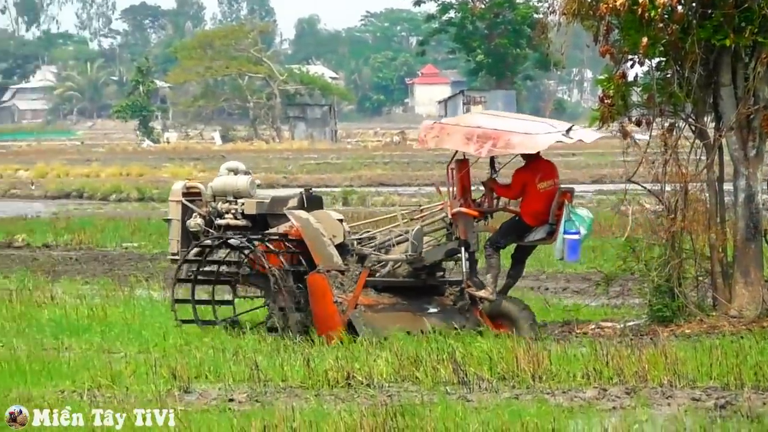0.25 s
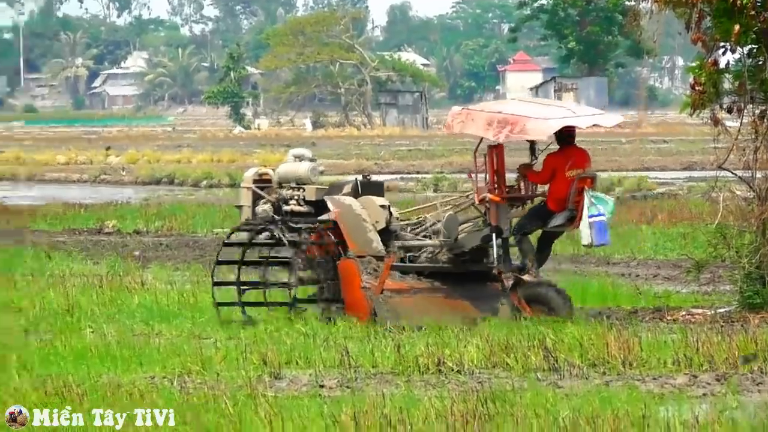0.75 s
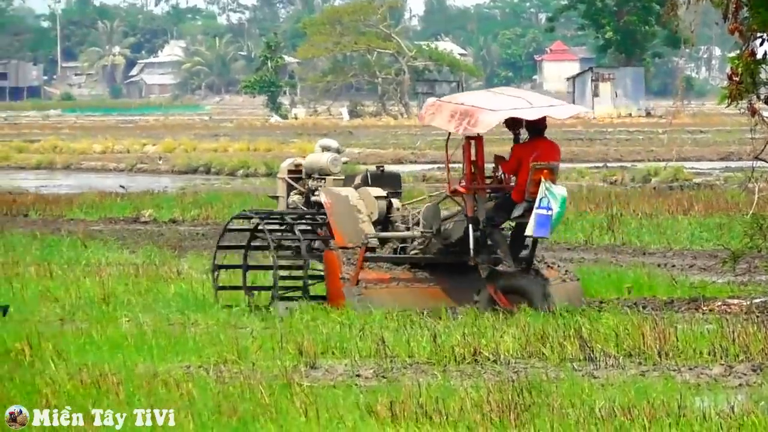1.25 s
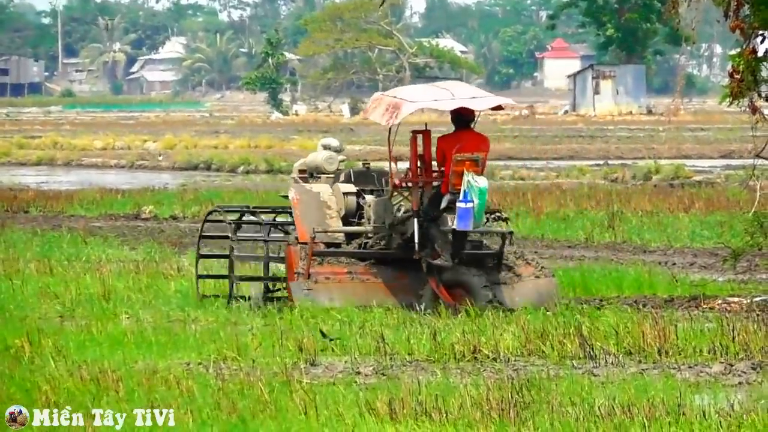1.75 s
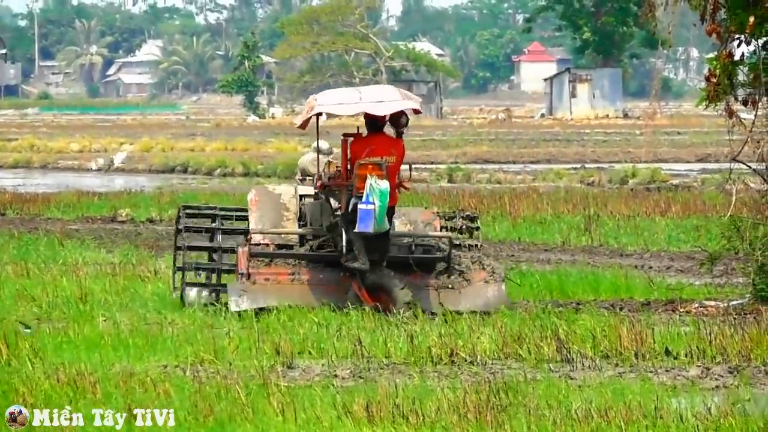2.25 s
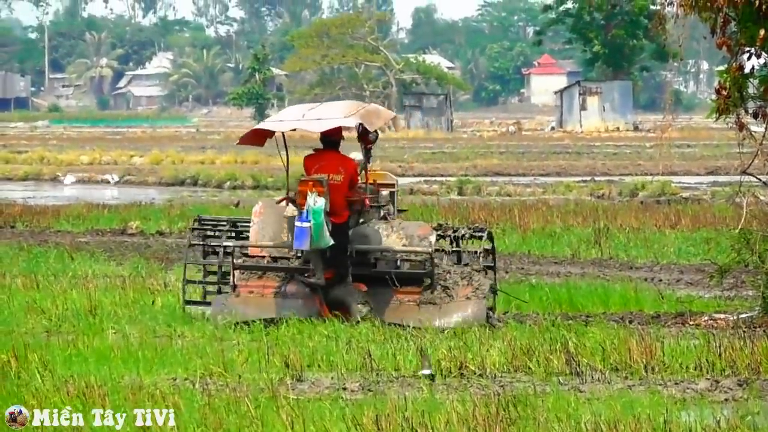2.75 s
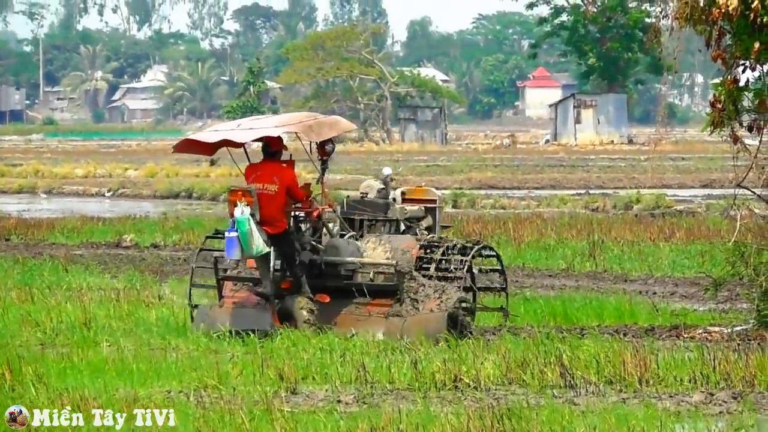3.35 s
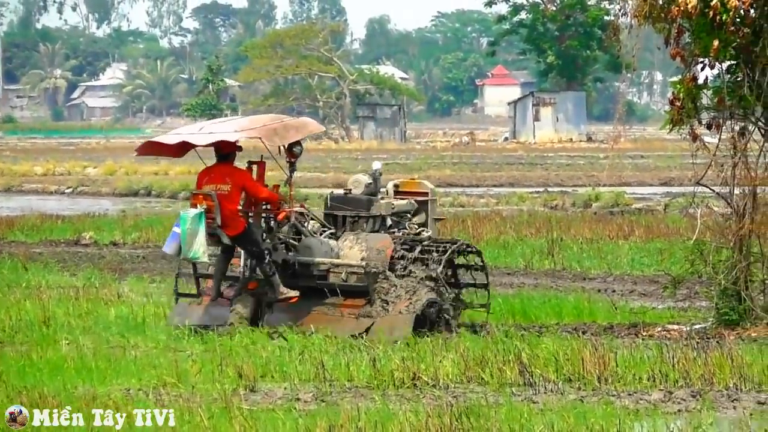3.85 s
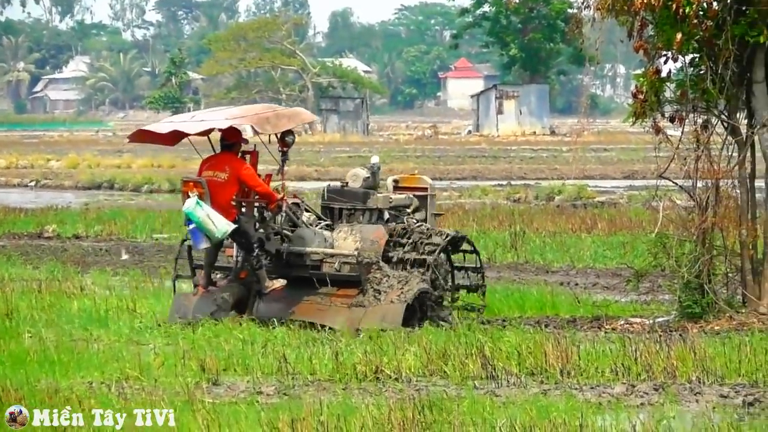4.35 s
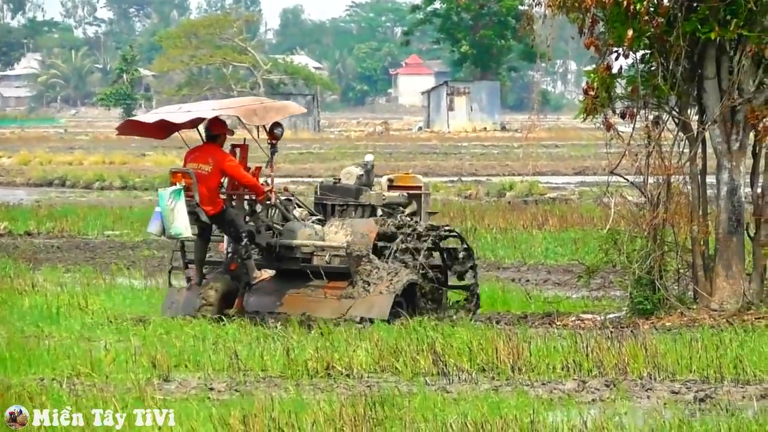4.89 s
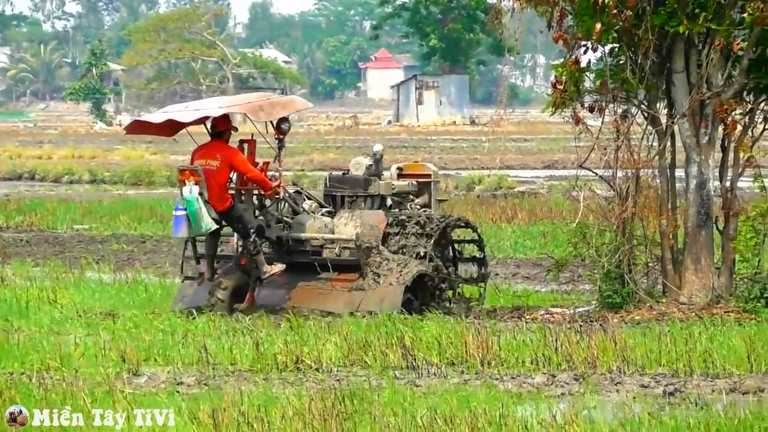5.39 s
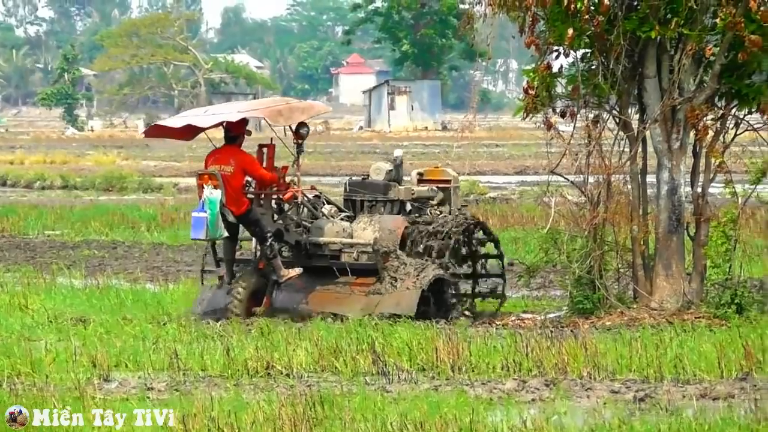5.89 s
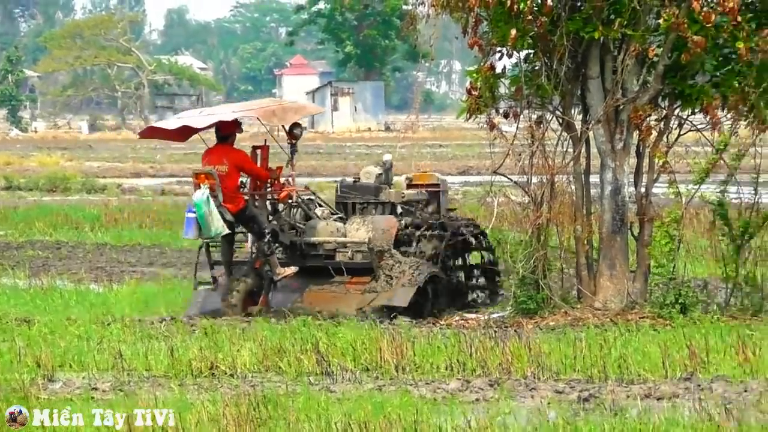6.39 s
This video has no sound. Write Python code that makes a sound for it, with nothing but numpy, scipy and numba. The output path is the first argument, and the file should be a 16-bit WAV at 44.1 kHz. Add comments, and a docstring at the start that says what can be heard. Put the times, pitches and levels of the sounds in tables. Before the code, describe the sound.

An open wet field, a diesel tiller at a distance and wind directly on a stereo microphone. From 0 s the engine chugs rapidly at about 47 firings a second, a rough noisy throb with block clatter and crisp injector knock, slightly hollow from ground reflection. Breeze and soft low puffs blow over it, and bright metal ticks cluster up to about 1.8 s. Around 2 s the engine's clatter drops back and the wind surges: heavy buffets and sharp pops, strongest near 2.3 s, with the left side generally louder. From 2.5 s the deep bass thins, leaving drier flutters, with another big pop near 3.55 s. The engine bogs slightly around 3.9 s, then climbs from about 4.5 s to a faster, brighter run by 5.8 s. Duller clacks appear after 4.3 s. Between 5.6 and 6.4 s two gear tones whine, flicker and fade; wind and engine continue to the end.

```python
"""In a wet field a four-cylinder diesel tiller turns, far from a camera whose two microphone ports catch the wind.
From the start its firings gate noise of exhaust, block and injectors, and ground echo combs it; light air and
puffs pass, carried from the right port to the left. Metal ticks soon join, then pops of strong eddies.
After two seconds the bass thins out, returning only in part; late on, two gear tones whine and fade."""
import sys
import numpy as np
from scipy import signal
from scipy.fft import rfft, irfft
from scipy.io import wavfile
from scipy.ndimage import uniform_filter1d
from numba import njit

SR = 44100
rng = np.random.default_rng(int(sys.argv[2]) if len(sys.argv) > 2 else 0)


def put_to_file(sound):
    """Save the sound as 16-bit audio at rate SR, in the file named by the first command-line argument."""
    columns = np.atleast_2d(sound).T  # one column per channel
    safe = np.clip(columns, -1, 1)
    whole_steps = np.round(safe * 32767)
    wavfile.write(sys.argv[1], SR, whole_steps.astype(np.int16))


N = 292369  # length [samples]


def undb(db):
    """Decibels to amplitude ratio."""
    return 10 ** (np.asarray(db) / 20)


def unit(x):
    """Scale x to rms 1."""
    return x / np.sqrt(np.mean(x ** 2))


def noise():
    """White noise of the full length."""
    return rng.standard_normal(N)


def curve(table):
    """Columns of a table joined by straight lines, one value a sample."""
    s, *columns = np.transpose(table)
    return [np.interp(np.arange(N) / SR, s, c) for c in columns]


def colour(x, points):
    """Shape x by (frequency [Hz], level [dB]) points joined on a log frequency axis; rms 1."""
    hz, db = np.transpose(points)
    f = np.maximum(np.fft.rfftfreq(len(x), 1 / SR), 1)
    gain_db = np.interp(np.log(f), np.log(hz), db, -90, -90)
    return unit(irfft(rfft(x) * undb(gain_db), len(x)))


def band(x, lo_hz, hi_hz):
    """Fixed band-pass."""
    return signal.sosfilt(signal.butter(N=2, Wn=[lo_hz, hi_hz], btype="band", fs=SR, output="sos"), x)


def low(x, hz, order):
    """Fixed low-pass."""
    return signal.sosfilt(signal.butter(N=order, Wn=hz, fs=SR, output="sos"), x)


@njit
def svf(x, hz, k):
    """State-variable filter with a moving corner and damping k: low-pass and high-pass."""
    low, high, b, l = np.empty(len(x)), np.empty(len(x)), 0., 0.
    for i in range(len(x)):
        g = np.tan(np.pi * hz[i] / SR)
        v = (b + g * (x[i] - l)) / (1 + g * (g + k))
        low[i] = l + g * v
        high[i] = x[i] - k * v - low[i]
        b, l = 2 * v - b, 2 * low[i] - l
    return low, high


def resonate(x, hz, width):
    """The moving band left when lows and highs are taken away."""
    return x - sum(svf(x, hz, width))


def walk(rate):
    """Random levels held 1 / rate s and slewed twice; rms 1."""
    k = int(SR / rate)
    held = np.repeat(rng.standard_normal(N // k + 1), k)
    return unit(uniform_filter1d(uniform_filter1d(held, k), k)[:N])


def late(x, samples):
    """x heard a (moving) number of samples later."""
    return np.interp(np.arange(N) - samples, np.arange(N), x)


# engine speed: (time [s], mean firing rate [Hz], load [0-1])
REVS = [(0, 45.5, 0.5), (.5, 47.35, 0.7), (.85, 46.15, 0), (1.2, 47.3, 0.83), (2, 46.9, 0.26),
        (3.2, 47.4, 0.36), (3.6, 48.43, 1), (3.9, 41.92, 1), (4.4, 44.04, 0.6), (4.7, 46.84, 0.6),
        (4.95, 50.8, 0.6), (5.2, 51.7, 0.3), (5.5, 56.3, 0.65), (5.8, 58.8, 0.6), (6.63, 58.9, 0.65)]
# strength of the four firings of a cycle, before random spread: (level [dB])
CYLINDERS_DB = [3.6, 1.3, 7.6, 1.8]
# mean exhaust level: (time [s], level [dB])
EXHAUST_LEVEL = [(0, -30), (1.9, -31), (2.4, -35), (3.7, -29), (5, -31), (6.63, -28)]
# mean engine levels: (time [s], block clatter [dB], injector knock [dB])
ENGINE = [(0, -51, -54.5), (.45, -52.5, -52.5), (.6, -51.5, -55), (1.45, -50.5, -52.5), (1.7, -52.5, -54),
          (2.07, -61.5, -58.5), (2.5, -58.5, -57.5), (3.12, -54.5, -60), (3.55, -51, -56.5),
          (3.69, -46.5, -52.5), (3.92, -50.5, -53.5), (4.02, -49.5, -57), (4.41, -51, -56),
          (4.78, -48, -51), (5.04, -50, -58), (5.35, -52, -57.5), (5.62, -47.5, -49.5), (5.85, -49, -53),
          (6.08, -46.5, -54.5), (6.63, -47.5, -54)]
# exhaust spectrum: (frequency [Hz], relative density [dB per Hz])
EXHAUST = [(25, -8), (60, 1), (120, -1), (240, 3), (290, -3), (390, -3), (465, -3), (500, -5.5),
           (575, -14.5), (625, -7), (655, -6.5), (730, -7.5), (790, -7), (890, -11), (970, -17),
           (1090, -24.5), (1200, -22.5), (2000, -28.5), (3000, -38.5)]
# block clatter spectrum: (frequency [Hz], relative density [dB per Hz])
CLATTER = [(900, 7.5), (1500, 6), (1900, -6), (2300, -2), (2600, -3.5), (3200, 3.5), (3650, -0.5),
           (4000, 2.5), (4300, -2), (4650, -7.5), (4900, -2.5), (5200, -19), (6500, -1)]
# injector knock spectrum: (frequency [Hz], relative density [dB per Hz])
KNOCK = [(3500, -3.5), (5000, -0.5), (6500, 0), (8300, 0.5), (9500, -6), (11000, -21.5), (13000, -28),
         (15600, -35)]
# ungated gas hiss spectrum, level following the knock: (frequency [Hz], relative density [dB per Hz])
HISS = [(7000, -14), (9500, -1), (11000, 0), (13000, -7), (15600, -10)]
HISS_DB = -15  # mean, relative to the knock


def diesel():
    """Each firing opens a burst of noise in exhaust, block and injectors; load deepens the throb."""
    hz, load = curve(REVS)
    count = np.cumsum(hz * (1 + 0.028 * walk(12))) / SR
    firing, phase = count.astype(int), count % 1
    spread_db = 2.0 * rng.standard_normal(firing[-1] + 1)
    size = load * undb(np.array(CYLINDERS_DB)[firing % 4] + spread_db[firing])

    def burst(points, depth, rise):
        """Noise under the firing gate; rise is the share of a firing period up to its peak."""
        gate = 1 + depth * size * phase / rise * np.exp(1 - phase / rise)
        # dividing by the local mean leaves the throb but evens the level
        return colour(gate / uniform_filter1d(gate, SR // 8) * noise(), points)

    exhaust_db, = curve(EXHAUST_LEVEL)
    clatter_db, knock_db = curve(ENGINE)
    exhaust = undb(exhaust_db + 0.2 * walk(15)) * burst(EXHAUST, depth=0.6, rise=0.099)
    clatter = undb(clatter_db + 0.83 * walk(11)) * burst(CLATTER, depth=0.52, rise=0.23)
    knock = undb(knock_db + 0.74 * walk(18)) * burst(KNOCK, depth=0.73, rise=0.064)
    hiss = undb(knock_db + HISS_DB + 1.2 * walk(14)) * colour(noise(), HISS)
    return exhaust + clatter + knock + hiss


GROUND_MS, GROUND_SHARE = 0.904, 0.39  # delay, and strength of the echo against the direct sound
GROUND_HZ = 4000  # stubble scatters the echo above this


def ground_echo(machine):
    """A delayed, dulled copy off the wet soil combs the machine's sound."""
    echo = low(late(machine, SR * GROUND_MS / 1000), GROUND_HZ, order=2)
    return (machine + GROUND_SHARE * echo) / np.hypot(1, GROUND_SHARE)


# light air spectrum at the ports: (frequency [Hz], relative density [dB per Hz])
BREEZE = [(20, 13.5), (60, -1), (150, -8.5), (350, -12.5), (800, -13.5), (1500, -32), (3000, -29)]
BREEZE_DB = -43  # mean level
BREEZE_SHARED_HZ = 70  # slower swirls press on both ports alike


def breeze():
    """Light air that never rests: unrelated on the two ports but for its deepest part."""
    both = np.array([undb(BREEZE_DB + 4.1 * walk(8.8)) * colour(noise(), BREEZE) for _ in range(2)])
    deep = low(both, BREEZE_SHARED_HZ, order=1)
    return both - deep + deep.sum(axis=0) / np.sqrt(2)


PORT_GAP_MM, EDDY_MM, EDDIES_KEPT = 3.08, 10.77, 0.62  # gap, eddy size, amplitude share that survives it
PORT_HZ, LEE_HZ = 2350, 1130  # the port mesh stops the finest eddies; they also fade on the way across
CHURN_DB, CHURN_PER_S = 3.5, 45  # spread and rate of the churn's level
SPEED_SPREAD, GUST_M_S_PER_DB = 0.068, 0.067  # share the speed wanders; extra speed per dB above mean churn
CRACKLE_DB, CRACKLE_PER_S = -15.5, 350
# air across the port edge sings a loose pitch; ratios are to the eddy rate
WHISTLE_DB, WHISTLE_RATIO, WHISTLE_WIDTH, WHISTLE_WANDER = -11.5, 1.377, 0.25, 0.2
MOAN_DB, MOAN_RATIO, MOAN_WIDTH = -8.5, 0.418, 0.29  # the housing sheds slower swirls that hum a lower pitch
POP_LEFT_DB = -7  # extra share of each pop that bursts on the left port
POP_WAKE_DB, POP_WAKE_MS = -18, 7.3  # rush of air behind a pop: relative level, decay time of its power
# wind: (time [s], base air speed [m/s], left minus right [dB], mean level of the churn between puffs [dB])
WIND = [(0, 1.67, 2, -40.5), (.5, 4.04, 1, -46.5), (1.0, 3.4, 8, -36), (1.5, 2.58, -1, -44),
        (1.98, 2.7, 6, -51), (2.14, 4.5, 4.5, -34), (2.2, 4.3, 3.5, -29.5), (2.31, 4.25, 3, -31),
        (2.42, 4.93, 1.5, -23.5), (2.48, 7.2, 9, -31.5), (2.55, 4.37, 6, -34.5), (2.8, 4.9, 4.5, -30.5),
        (3.35, 6.1, 8, -27.5), (3.47, 6.2, 5, -36.5), (3.63, 6.3, 8.5, -38), (3.8, 6.9, 10, -32),
        (3.97, 5.5, 8, -30.5), (4.12, 6.7, 9.5, -51), (4.25, 6.15, 15, -38.5), (4.55, 5.7, 9, -35),
        (5.05, 6.3, 9, -37.5), (5.15, 6.1, 9.5, -42), (5.4, 5.66, 6.5, -33), (5.6, 4.5, 5, -31.5),
        (5.7, 3.94, 6, -35), (5.95, 4.06, 3.5, -32.5), (6.63, 4.15, 6.5, -34)]
# the strongest puffs: (time of the middle [s], level [dB], length at half power [ms])
PUFFS = [(0.084, -28, 9.9), (0.119, -26, 13), (0.508, -22, 35.5), (0.815, -24, 4.7), (0.876, -28.5, 7.2),
         (1.204, -24, 15), (2.018, -21, 16.6), (2.055, -21.5, 27), (2.109, -21.5, 36), (2.157, -25, 10),
         (2.185, -16.5, 23), (2.205, -27, 17), (2.24, -15, 36), (2.384, -18.5, 47), (2.43, -27, 30),
         (2.475, -12.5, 8), (2.563, -23, 62), (2.637, -23.5, 38), (2.713, -18.5, 3.8), (2.744, -19, 38),
         (2.79, -21.5, 11), (2.829, -18.5, 43), (2.89, -22, 30), (2.934, -17.5, 23), (2.976, -19, 19),
         (3.007, -16.5, 9.3), (3.091, -23.5, 64), (3.217, -19, 40), (3.312, -24, 73), (3.397, -16.5, 6.2),
         (3.435, -16, 16.5), (3.559, -17, 39), (3.516, -23.5, 15), (3.77, -20.5, 5.4), (3.803, -22.5, 8.8),
         (3.845, -26, 8.2), (3.941, -24, 47), (4.003, -21, 20), (4.05, -25, 30), (4.11, -23.5, 39),
         (4.144, -25, 11), (4.287, -30.5, 13), (4.512, -25.5, 13), (4.539, -22, 9.3), (4.57, -22, 6.2),
         (4.602, -23.5, 19), (4.671, -19.5, 24), (4.734, -23, 17), (4.772, -24, 34), (4.865, -21, 52),
         (4.923, -24, 19), (4.985, -21.5, 18), (5.025, -22, 29), (5.075, -24, 9.1), (5.195, -24, 15),
         (5.237, -25, 30), (5.276, -18.5, 13.2), (5.359, -17.5, 51), (5.4, -21, 20), (5.448, -20, 34),
         (5.501, -24, 50), (5.537, -22, 14), (5.646, -22, 16), (5.67, -25.5, 22), (5.738, -22.5, 25),
         (5.767, -22, 6.6), (5.831, -20.5, 27), (5.89, -18, 15), (5.929, -21, 30), (5.964, -26, 14),
         (6.035, -17, 17.4), (6.062, -19.5, 18), (6.241, -21.5, 43.8), (6.295, -22, 7.8),
         (6.357, -19.5, 22), (6.4, -21, 24), (6.473, -22, 43), (6.559, -17, 31), (6.588, -16.5, 6.1)]


def wind():
    """Eddies carried past both ports: faster air is brighter and crosses the gap sooner."""
    t = np.arange(N) / SR
    base_speed, pan_db, churn_db = curve(WIND)
    power = undb(2 * (churn_db + CHURN_DB * walk(CHURN_PER_S)))
    for s, db, ms in PUFFS:
        power += undb(2 * db) * np.exp(-4 * np.log(2) * ((t - s) / (ms / 1000)) ** 2)
    for s, db, *_ in POPS:
        wake = (t > s) * np.exp(-np.abs(t - s) / (POP_WAKE_MS / 1000))
        power += undb(2 * (db + POP_WAKE_DB)) * wake
    # a puff is faster air than the churn round it; the speed also wanders
    gust = GUST_M_S_PER_DB * (10 * np.log10(power) - churn_db)
    speed = np.maximum(base_speed * (1 + SPEED_SPREAD * walk(25)) + gust, 1)
    hz = np.clip(speed / (EDDY_MM / 1000), 100, 4000)  # eddies passing a second

    def eddies(bottom):
        """Body, snaps, whistle and moan of the air; the body starts at bottom times the eddy rate."""
        lumpy = undb(2.8 * walk(220) + 1.26 * walk(90)) * noise()
        body = svf(svf(lumpy, hz, 0.87)[0], 1.41 * hz, 2.56)[0] / np.sqrt(hz)
        body = svf(body, bottom * hz, 1.13)[1]

        pitch_hz = WHISTLE_RATIO * hz * np.exp(WHISTLE_WANDER * walk(22))
        whistle = resonate(lumpy, pitch_hz, WHISTLE_WIDTH)
        whistle = resonate(whistle, pitch_hz, 2 * WHISTLE_WIDTH) / np.sqrt(pitch_hz)

        moan_hz = MOAN_RATIO * hz * np.exp(0.15 * walk(16))
        moan = resonate(undb(3.9 * walk(24)) * noise(), moan_hz, MOAN_WIDTH) / np.sqrt(moan_hz)

        # tiny eddies snap now and then and reach higher
        snaps = (rng.random(N) < CRACKLE_PER_S / SR) * noise()
        snaps = svf(svf(snaps, 1.83 * hz, 2.0)[0], 3.7 * hz, 6.0)[0]
        snaps = svf(snaps, 1.16 * hz, 0.4)[1]

        mix = unit(body) + undb(CRACKLE_DB) * unit(snaps)
        mix += undb(WHISTLE_DB) * unit(whistle) + undb(MOAN_DB) * unit(moan)
        return np.sqrt(power) * mix

    # large eddies cover both ports, so the fresh ones are small
    bursts = pops()
    right, fresh = eddies(bottom=0.15) + bursts, eddies(bottom=0.31)
    lag = SR * PORT_GAP_MM / 1000 / speed
    carried = EDDIES_KEPT * low(late(right, lag), LEE_HZ, order=1)
    left = carried + np.sqrt(1 - EDDIES_KEPT ** 2) * fresh + undb(POP_LEFT_DB) * late(bursts, lag)
    pan = undb(np.array([pan_db, -pan_db]) / 2)
    return pan * low(np.array([left, right]), PORT_HZ, order=4)


TICK_CYCLES = 12  # a tick fades to about a third in this many cycles of its ring
# linkage ticks: (time [s], rms level before the fade [dB], ring [Hz])
TICKS = [(0.0957, -52, 6500), (0.163, -45, 6300), (0.2274, -43, 7500), (0.25, -47, 7000),
         (0.295, -51, 6800), (0.3156, -45, 4000), (0.334, -47, 7000), (0.4459, -36, 6500),
         (0.477, -41, 6500), (0.687, -44, 8000), (0.853, -51, 8300), (0.88, -47, 8200), (1.1902, -44, 7800),
         (1.253, -50, 7300), (1.2744, -44, 7996), (1.577, -55, 7500), (1.812, -45, 8520),
         (3.6634, -47.5, 3310), (3.7083, -44, 4120), (4.321, -36.5, 2350), (4.4211, -36, 2155),
         (4.5233, -41, 2457), (4.7959, -41, 4080), (4.8184, -36, 2120), (5.6394, -50, 2016),
         (5.793, -43, 2200), (6.01, -44, 2300), (6.111, -41, 2882), (6.34, -36, 1900), (6.449, -44, 1927)]


def ticks():
    """Short metal clacks: a fading burst of noise round the ring of the part."""
    out, t = np.zeros(N + 2000), np.arange(2000) / SR
    for s, db, hz in TICKS:
        i = int(s * SR)
        ring = rng.standard_normal(2000)
        for _ in range(2):
            ring = band(ring, 0.78 * hz, 1.32 * hz)
        out[i:i + 2000] += undb(db) * np.exp(-t * hz / TICK_CYCLES) * unit(ring)
    return out[:N]


POP_CYCLES, POP_ROUNDING = 1.3, 1.4  # ring length and how abruptly it ends
# strong single eddies on the ports: (time [s], swing before its envelope [dB], pitch [Hz], crack [dB])
POPS = [(0.484, -16.5, 111, -55), (0.5, -15, 230, -52), (0.69, -16.5, 137, -55), (0.806, -10.5, 267, -52),
        (2.015, -9, 258, -51), (2.176, -8, 247, -34), (2.224, -10, 245, -30), (2.257, -4.5, 235, -43),
        (2.267, 3, 330, -27.5), (2.341, -15, 190, -45), (2.35, -10, 400, -34), (2.376, -7, 357, -34),
        (2.388, -16, 251, -36), (2.424, -16, 400, -34), (2.472, -32, 450, -28), (2.647, -13, 500, -36),
        (2.711, -10, 324, -49), (2.734, -11, 405, -37), (2.931, -8.5, 344, -38), (3.326, -10, 300, -42),
        (3.399, -7, 403, -41), (3.422, -11, 346, -33), (3.504, -15, 412, -41), (3.552, 1.5, 443, -24),
        (3.566, -15, 450, -30), (3.687, -11, 282, -40), (3.757, -6.5, 641, -44), (3.903, -12.5, 327, -40),
        (3.994, -11, 302.4, -30), (4.012, -6, 1290, -40), (4.044, -6, 695, -44), (4.082, -3.5, 740, -42),
        (4.139, -15, 600, -42), (4.566, -9.5, 454, -43), (4.656, -16, 378, -36), (4.663, -12, 398, -38),
        (4.725, -10, 516, -50), (4.768, -12, 250, -50), (4.801, -9, 646, -38), (4.834, -12, 303, -42),
        (4.871, -13, 411, -35), (5.031, -10.5, 275, -25.5), (5.332, -12, 298, -43),
        (5.347, -18.5, 350, -45), (5.36, -8.5, 349, -35), (5.374, -8, 458, -35), (5.477, -10.5, 258.5, -46),
        (5.637, -9.5, 386, -52), (5.821, -7, 453, -37), (5.864, -11, 300, -42), (5.885, -11, 277, -32),
        (5.913, -11.5, 210, -48), (5.923, -6, 216, -45), (5.934, -16, 230, -42), (6.026, -15, 278, -42),
        (6.192, -13, 499.5, -30), (6.474, -6, 283.7, -28), (6.358, -9.5, 201, -45), (6.429, -9.5, 250, -45),
        (6.525, -13, 350, -38), (6.583, -9.5, 210, -45)]


def pops():
    """Each pop is a quick swing that dies in a cycle or two, with a crack on its front."""
    out, t = np.zeros(N + 1000), np.arange(1000) / SR
    for s, db, hz, crack_db in POPS:
        i = int(s * SR)
        c = rng.standard_normal(1000)
        envelope = (1 - np.exp(-t / 0.0011)) * np.exp(-(t * hz / POP_CYCLES) ** POP_ROUNDING)
        swing = np.sign(c[0]) * np.sin(2 * np.pi * hz * t) * envelope  # pushes in or out at random
        crack = unit(band(c, 440, 3100)) * t / 0.0019 * np.exp(1 - t / 0.0016)
        out[i:i + 1000] += undb(db) * swing + undb(crack_db) * crack
    return out[:N]


# full pitch of the low and the high meshing tone: (frequency [Hz])
GEARS_HZ = [752, 1890]
GEARS_RASP_DB = -9  # relative to the tone
# gear whine: (time [s], pitch below full [%], low tone mean rms [dB], high tone mean rms [dB])
GEARS = [(5.56, 1.23, -70, -77), (5.62, 0.8, -39.5, -56), (5.69, 0.33, -51, -59), (5.74, 0, -43, -54),
         (5.775, 0.25, -41, -62), (5.82, 0.28, -40, -55.5), (5.87, 0, -41, -56), (5.9, 0.17, -33, -53),
         (5.935, 0, -37, -50), (5.99, 0.37, -41.5, -61), (6.06, 0, -41, -55), (6.12, 0, -51, -54),
         (6.16, 0.47, -31, -60), (6.185, 0, -54, -55), (6.22, 0.02, -34, -61), (6.28, 0, -44, -57),
         (6.35, 0, -42, -56), (6.42, 0.095, -47, -71), (6.47, 0.11, -75, -80)]


def gears():
    """Two meshing tones that climb to pitch, flicker each on its own and fade out, with rasp of worn teeth."""
    under_pitch, *levels = curve(GEARS)
    out = np.zeros(N)
    for hz, db in zip(GEARS_HZ, levels):
        flicker_db = 2.2 * walk(90) + 0.5 * walk(14)
        bend = 0.002 * walk(30) + 0.005 * walk(150)
        turns = np.cumsum(hz * (1 - under_pitch / 100) * (1 + bend)) / SR
        tone = np.sqrt(2) * np.sin(2 * np.pi * turns)
        rasp = undb(GEARS_RASP_DB) * unit(band(noise(), 0.97 * hz, 1.03 * hz))
        out += undb(db + flicker_db) * (tone + rasp)
    return out


def scene():
    """The distant machine, equal on both ports, under the wind that strikes them."""
    machine = diesel() + gears() + ticks()
    return ground_echo(machine) + wind() + breeze()


BASS_LEAK_DB = -26  # a little deep bass always passes the edge
WIDEN_DB, WIDEN_HZ = 1.5, 2100  # boost of the stereo side, and its upper edge
WIDEN_TOP_DB = -12.5  # the widening grows towards its upper edge
SELF_NOISE_DB = -73.5
TOP_HZ = 15640
# microphone self-noise spectrum: (frequency [Hz], relative density [dB per Hz])
SELF_NOISE = [(5000, -40), (8000, 4), (11000, 9), (15600, 5)]
# where the bass thins out: (time [s], edge [Hz])
BASS_EDGE = [(2.3, 22), (2.45, 40), (2.6, 136), (3.2, 144.9), (3.7, 195), (4.3, 162), (5.0, 112)]


def record(dry):
    """The bass thins out along a set edge, stereo widens below the treble, peaks soften, hiss joins, the top is cut."""
    edge, = curve(BASS_EDGE)

    def thin(c):
        """Two moving high-passes plus the bass leak."""
        cut = svf(svf(c, edge, 1.97)[1], 0.5 * edge, 1.22)[1]
        return cut + undb(BASS_LEAK_DB) * low(c, 60, order=2)

    left, right = (thin(c) for c in dry)
    side = low((left - right) / 2, WIDEN_HZ, order=4)
    side = side + undb(WIDEN_TOP_DB) * band(side, 860, 2000)
    both = (left + right) / 2 + undb(WIDEN_DB) * side * np.array([[1], [-1]])
    softened = both / (1 + both ** 4) ** (1 / 4)
    hiss = np.array([colour(noise(), SELF_NOISE) for _ in range(2)])
    top_cut = signal.ellip(12, .2, 80, TOP_HZ, fs=SR, output="sos")
    return signal.sosfilt(top_cut, softened + undb(SELF_NOISE_DB) * hiss)


dry = scene()
out = record(dry)
put_to_file(out)
```